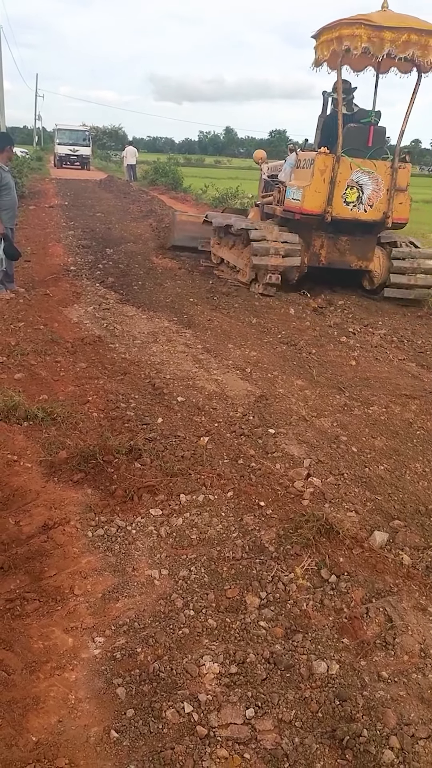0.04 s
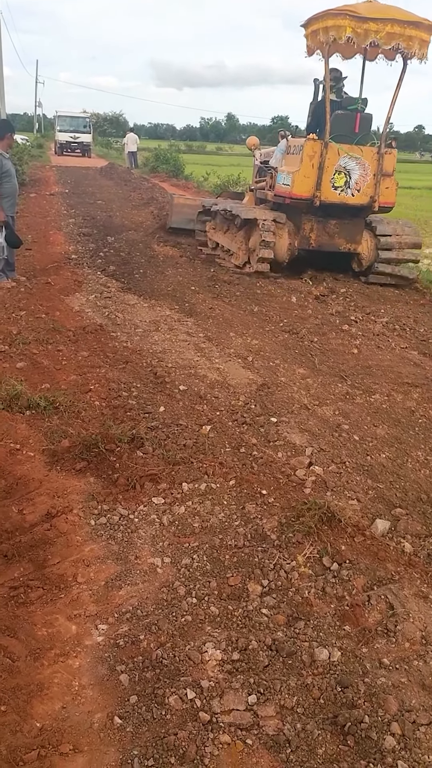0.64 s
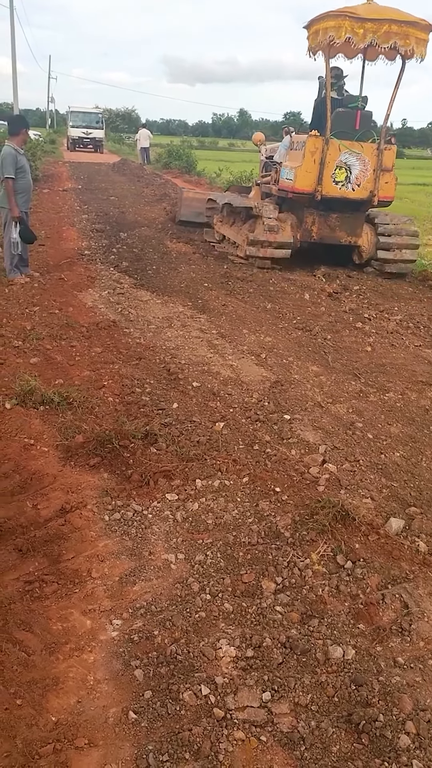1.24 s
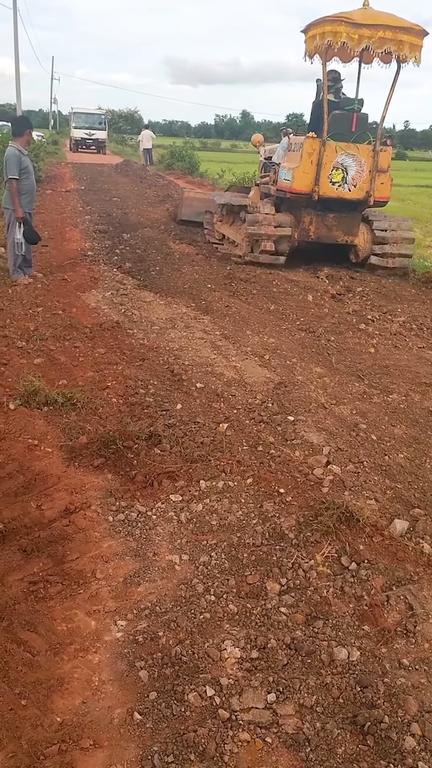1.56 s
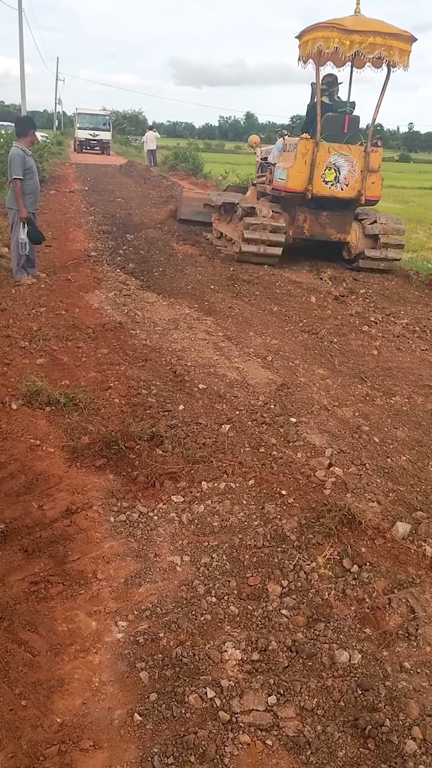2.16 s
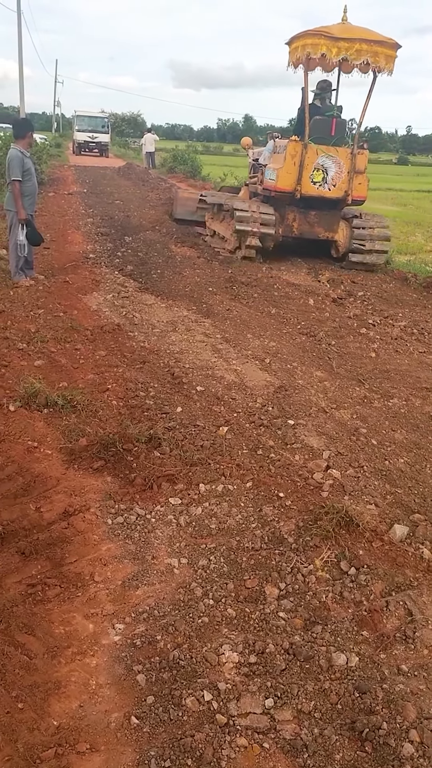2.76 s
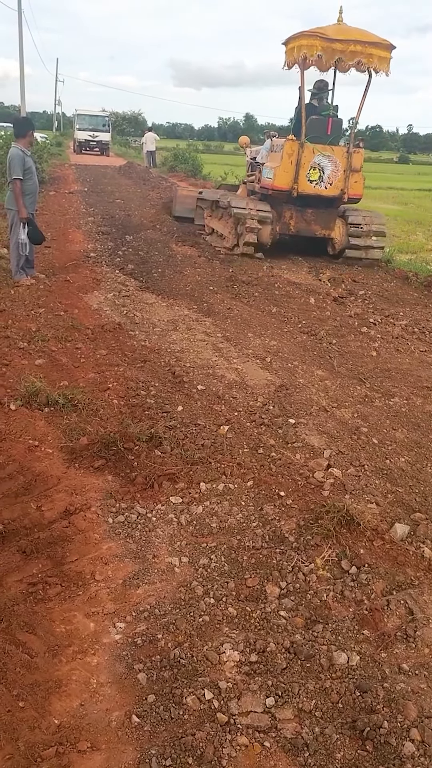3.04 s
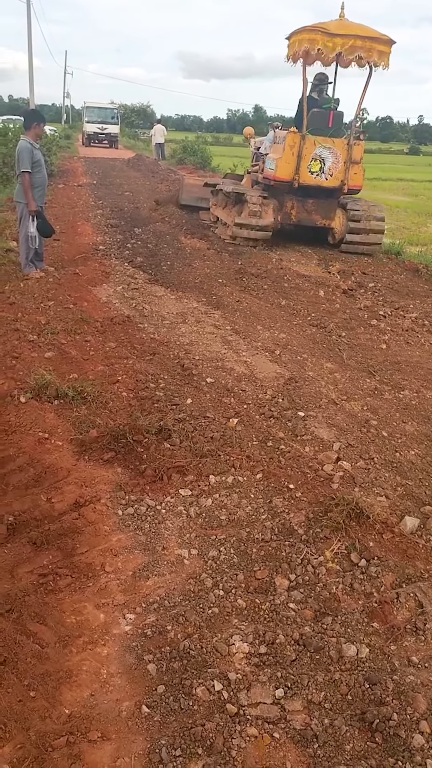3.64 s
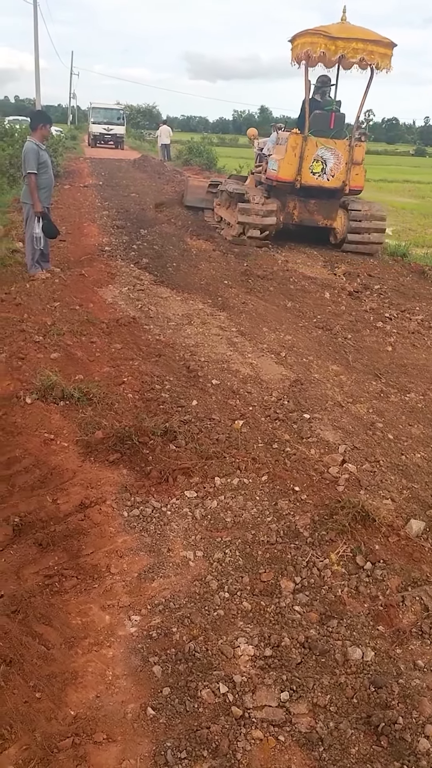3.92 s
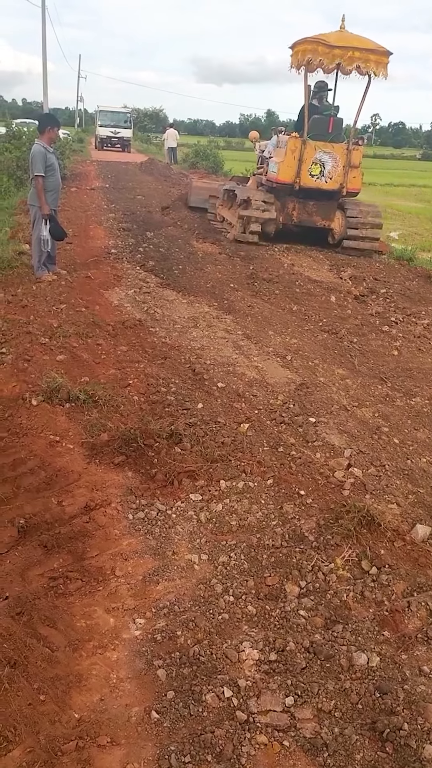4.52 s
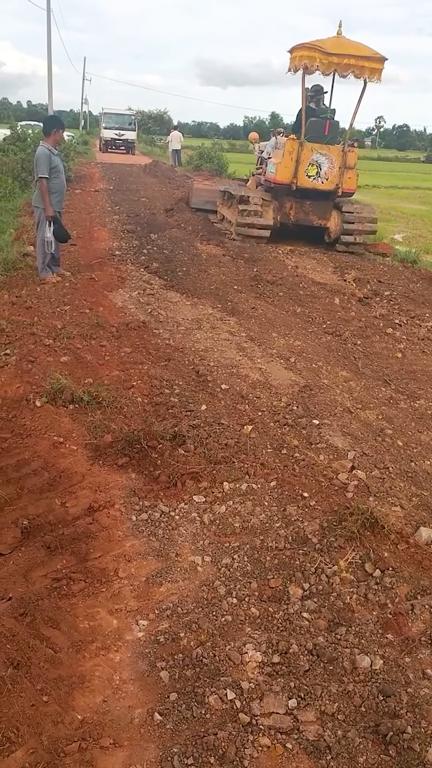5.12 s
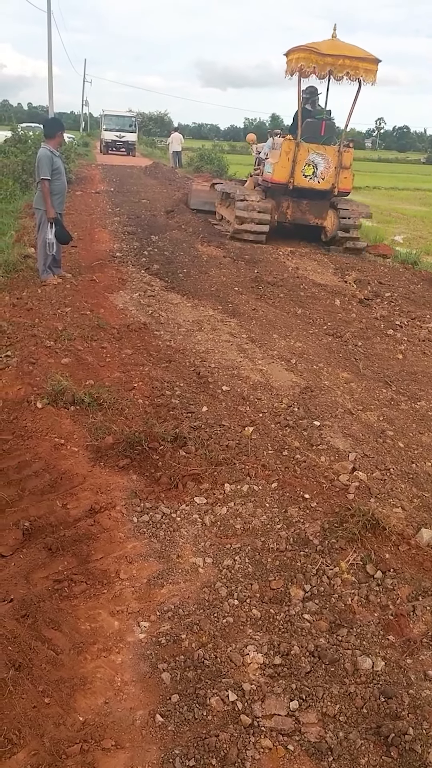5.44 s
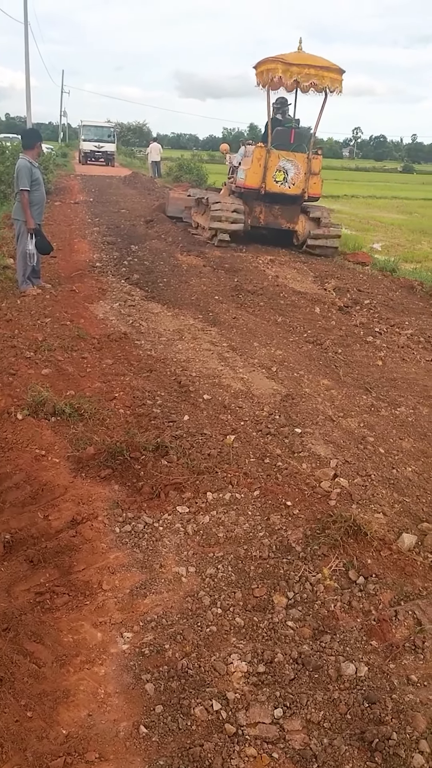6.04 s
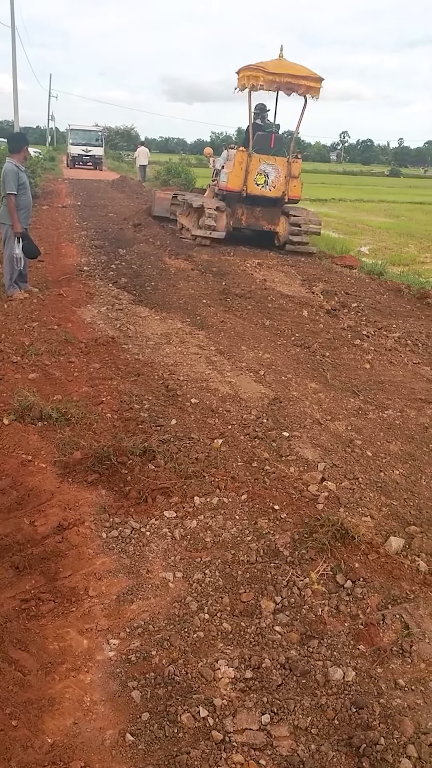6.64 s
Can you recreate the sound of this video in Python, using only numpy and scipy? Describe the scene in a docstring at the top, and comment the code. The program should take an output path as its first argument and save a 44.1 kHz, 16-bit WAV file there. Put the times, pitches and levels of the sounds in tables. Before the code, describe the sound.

Wind buffets the microphone over the diesel drone, clinking tracks and gravel crunch of a slowly receding bulldozer.

```python
"""First you hear a diesel drone and crunching gravel, with gusts thumping a hand-held phone's microphone.
It is a small bulldozer crawling away along a dirt road at steady throttle. The exhaust drones and puffs
twice a cycle, each firing of the four cylinders knocks the engine block, and a drive gear whines.
The steel track links clink onto their toothed wheels, some striking with a snap; dry pins squeak,
and track plates clank onto the rollers and scrape along their guides."""
import sys
import numpy as np
from scipy import signal
from scipy.fft import rfft, irfft
from scipy.io import wavfile
from scipy.ndimage import uniform_filter1d

SR = 44100
rng = np.random.default_rng(int(sys.argv[2]) if len(sys.argv) > 2 else 0)


def bounce(signal):
    """Save signal as a 16-bit WAV file at the path given by the first command-line argument."""
    frames = np.transpose(np.atleast_2d(signal))
    limited = np.clip(frames, -1, 1)
    pcm = np.round(limited * 32767).astype(np.int16)
    wavfile.write(sys.argv[1], SR, pcm)


N = 303408
TIME = np.arange(N) / SR
FREQ = np.maximum(np.arange(N // 2 + 1) * SR / N, 1)
SIDE = np.array([[.5], [-.5]])  # splits a left-right difference between the two channels


def undb(db):
    """Turn decibels into a gain."""
    return 10 ** (np.asarray(db) / 20)


def unit(x):
    """Scale a signal to an average (rms) level of one."""
    return x / np.sqrt(np.mean(x ** 2))


def shape(points):
    """Gain at every frequency, drawn through (f/Hz, level/dB) points."""
    hz, db = np.transpose(points)
    return undb(np.interp(np.log(FREQ), np.log(hz), db))


def resonance(hz, width):
    """How a part that rings at one pitch responds to each frequency."""
    return 1 / (1 + 1j * (FREQ ** 2 - hz ** 2) / (FREQ * width))


def colour(x, response):
    """Filter a signal by a frequency response."""
    return irfft(rfft(x) * response, N)


def walk(rate):
    """Smooth random wandering of size about one, with `rate` steps a second."""
    k = int(SR / rate)
    steps = np.repeat(rng.standard_normal(N // k + 1), k)
    return 1.4 * uniform_filter1d(uniform_filter1d(steps, k), k)[:N]


def noise():
    """Three unrelated noises: one direct, and one scattered to each microphone opening."""
    return rng.standard_normal((3, N))


def burst(age, rise, t60):
    """Loudness of a blow: a quick rise, then a fall of 60 dB in t60 seconds."""
    age = np.clip(age, 0, 1)
    return (1 - np.exp(-age / rise)) * np.exp(-np.log(1000) * age / t60)


def swell(t, half_length):
    """A smooth rise and fall around time t."""
    return np.exp(-np.minimum(((TIME - t) / half_length) ** 2, 30))


def swells_db(table):
    """Add up a table's brief rises and dips in level."""
    return sum(db * swell(t, half) for t, db, half in table)


def receding(db_per_doubling, start_m=8.63, crawl_m_s=0.58):
    """Change of level in dB as the bulldozer gets farther away."""
    return -db_per_doubling * np.log2(1 + crawl_m_s * TIME / start_m)


# how the two microphone openings differ: f/Hz, left lead/rad, likeness (0-1), left minus right/dB
MIC_PORTS = [(200, 0.0, 0.95, -0.0), (380, -0.1, 0.56, 1.5), (540, -1.6, 0.27, -3.6),
             (780, -0.0, 0.97, -0.4), (1150, -1.2, 0.83, 3.5), (1550, -1.0, 0.71, 0.4),
             (2200, -1.9, 0.76, 5.5), (2800, -3.2, 0.95, 0.1), (3500, -3.2, 0.81, 1.9),
             (4100, -4.9, 0.35, 7.1), (4750, -6.3, 0.92, 0.1), (6000, -9.4, 0.64, 1.6),
             (7400, -13.3, 0.35, 1.8), (10000, -15.6, 0.43, 2.2)]
def ports(paths):
    """Direct sound reaches the right opening first; scattered sound reaches each on its own."""
    hz, *columns = np.transpose(MIC_PORTS)
    phase, likeness, pan_db = (np.interp(FREQ, hz, c) for c in columns)
    spectra = rfft(paths)
    direct = np.sqrt(likeness) * spectra[0] * np.exp(1j * SIDE * phase)
    scattered = np.sqrt(1 - likeness) * spectra[1:]
    return irfft((direct + scattered) * undb(SIDE * pan_db), N)


# engine speed, in cycles of four firings: t/s, f/Hz
ENGINE_SPEED = [(0, 20.486), (0.6, 20.416), (0.9, 20.767), (2.1, 20.464), (3.5, 20.27), (4.1, 20.281),
                (4.7, 20.395), (5.3, 20.229), (6.88, 20.416)]
def engine_cycles(first_firing_s=.0318, hunt_cycles=.011):
    """Count engine cycles; the speed governor hunts, so firings come a little early or late."""
    speed = np.interp(TIME, *np.transpose(ENGINE_SPEED))
    return 1 + np.cumsum(speed) / SR - first_firing_s * speed[0] + hunt_cycles * walk(3)


# exhaust tones (4 is the firing tone, the rest are overtones): multiple of the cycle rate, level/dB
EXHAUST_TONES = [(2, -13.5), (3, -18), (4, 0), (5, -23.5), (6, -4.5), (7, -19), (8, -16), (9, -8.5),
                 (10, -16.5), (12, -25.5), (18, -31.5)]
# the firing tone swells or drops out briefly: t/s, change/dB, half length/s
FIRING_SWELLS = [(.25, 1.5, .22), (.495, -5, .02), (.67, 2.5, .056), (.775, -11, .022), (1.35, -1.5, .39),
                 (1.5, 4.5, .028), (2.55, 4, .031), (2.65, 1.7, .5), (3.95, 1.5, .4), (4.48, -17, .027),
                 (4.61, -11, .026), (4.69, 3, .17), (4.765, -24, .019), (4.9, -8, .017), (5.027, -7, .032)]
# tone colour of the gas puffs: f/Hz, level/dB
PUFF_COLOUR = [(25, -32), (70, 8), (130, -7.5), (200, 7.5), (260, -4.5), (380, -6), (480, -33), (800, -68)]
# tone colour of the machine's low rumble: f/Hz, level/dB
RUMBLE_COLOUR = [(20, 2.5), (45, 4), (90, 1), (150, 16), (192, 7.5), (215, -8), (280, 3.5), (450, -23),
                 (800, -107)]
def exhaust(cycle, tone_db=-15, overtone_db=-19, puff_db=-12.5, rumble_db=-28.5, throb_hz=7):
    """Unequal cylinders drone in a stack of tones, with ragged puffs of gas and a low rumble."""
    silencer_hz, silencer_width_hz = 182.3, 7.4
    lope = np.cos(np.pi * cycle)  # strong and weak cycles take turns
    cycle = cycle + .003 * walk(22)
    tone, overtones = 0, 0
    for multiple, db in EXHAUST_TONES:
        # the tones bunch once a cycle, the strongest cylinder's chug; the silencer delays the upper ones
        hz = multiple * ENGINE_SPEED[0][1]
        lag = np.pi / 5 + np.arctan2(silencer_width_hz * hz, silencer_hz ** 2 - hz ** 2)
        wave = undb(db) * np.cos(2 * np.pi * multiple * cycle - lag)
        if multiple == 4:
            throb = np.sin(2 * np.pi * throb_hz * TIME + walk(2.04))
            tone = wave * undb(.95 * throb + .45 * lope + .6 * walk(20))
        else:
            overtones = overtones + wave
    overtones = overtones * undb(lope + .5 * walk(18))
    pulses = np.exp(-(2 * cycle % 1))  # two puffs a cycle
    puffs = unit(colour(pulses * rng.standard_normal(N), shape(PUFF_COLOUR)))
    rumble = unit(colour(rng.standard_normal(N), shape(RUMBLE_COLOUR))) * undb(rumble_db)
    tone = unit(tone) * undb(tone_db + receding(6.5) + swells_db(FIRING_SWELLS))
    chug = (unit(overtones) + undb(puff_db) * puffs) * undb(overtone_db + receding(2))
    return tone + chug + rumble


def loose_steel(low_hz, high_hz, t60, spread_db, count):
    """Hundreds of loose parts chatter: each touch rings briefly at a pitch of its own."""
    when, pitch, turn, left, right = rng.random((count, 5)).T
    size = undb(spread_db * np.minimum(rng.exponential(size=count), 3))
    age = TIME[:int(.7 * t60 * SR)]
    hz = low_hz + (high_hz - low_hz) * pitch
    rings = np.sin(2 * np.pi * (hz[:, None] * age + turn[:, None])) * burst(age, t60 / 10, t60)
    paths = np.zeros((3, N + len(age)))
    shares = size * np.array([np.ones(count), np.sign(left - .5), np.sign(right - .5)])
    for start, share, ring in zip((when * N).astype(int), shares.T, rings):
        paths[:, start:start + len(age)] += share[:, None] * ring
    return unit(paths[:, :N])


def link_blows(rise, t60, link_hz=4.088, near_s=0.067, far_s=0.1696, far_db=-3.5):
    """The steady beat of links landing on the toothed wheels, near track and far track in turn."""
    near, far = (burst((TIME - first) % (1 / link_hz), rise, t60) for first in (near_s, far_s))
    return near + undb(far_db) * far


# tone colour of the knocking and rattling: f/Hz, level/dB
BLOCK_COLOUR = [(200, 10), (450, -0.5), (650, 4.5), (1000, 6.5), (1450, 6.5), (1750, 1.5), (2000, 6.5),
                (2300, 7), (2560, 7), (2720, -26), (3050, -50), (3500, -3), (4400, -14), (8000, -72)]
# ringing body panels: f/Hz, width/Hz, level/dB
BODY_PANELS = [(722, 13, 8.5), (1243, 24, -2), (1474, 22.5, 5.5), (2295, 30, -15)]
# the wheels and tracks rattle harder or ease off: t/s, change/dB, half length/s
RATTLE_SURGES = [(0.965, 3, 0.078), (4.288, -5, 0.029), (5.06, -3.5, 0.086), (6.546, 2, 0.058)]
def block(cycle, rattle_db=-25, knock_db=-11, link_db=1.5):
    """Each firing knocks the engine block, while panels ring and the wheels and tracks rattle."""
    firing, since_firing = (4 * cycle).astype(int), 4 * cycle % 1
    strength = undb(3 * rng.standard_normal(firing[-1] + 1))[firing]
    knock = undb(knock_db) * strength * np.exp(-since_firing / .075)
    rattle = noise() * (.5 * undb(walk(28)) + knock)
    rattle = rattle + undb(-20) * loose_steel(600, 2600, t60=.07, spread_db=2.5, count=1800)
    panels = sum(undb(db) * colour(noise() * undb(2.5 * walk(11)), resonance(hz, width))
                 for hz, width, db in BODY_PANELS)
    surges_db = swells_db(RATTLE_SURGES) + .6 * walk(14)
    level_db = rattle_db + receding(7) + surges_db + link_db * link_blows(rise=0.0041, t60=0.31)
    return unit(ports(colour(rattle, shape(BLOCK_COLOUR)) + panels)) * undb(level_db)


# the gear sings out under load: t/s, level/dB, half length/s, f/Hz
GEAR_SQUEALS = [(.215, -27, .025, 1040), (.676, -22, .032, 1120), (.807, -24.5, .012, 1110),
                (1.095, -25, .02, 1235), (1.28, -27, .02, 1065), (1.418, -27, .026, 1120),
                (1.915, -26, .035, 1105), (2.55, -30, .04, 1100), (3.527, -29.5, .05, 1140),
                (3.95, -31.5, .043, 1150), (4.36, -33, .045, 1135), (4.76, -35, .07, 1130),
                (5.88, -35, .06, 1140)]
def gear(hz=1132, whine_db=-41.5, pan_db=3.5, lead_rad=1.63, flutter_db=2.5):
    """A drive gear sings faintly, and squeals at a shifted pitch whenever the load catches it."""
    pull_hz = sum((pitch - hz) * np.minimum(2 * swell(t, half), 1) for t, _, half, pitch in GEAR_SQUEALS)
    pitch_hz = hz + pull_hz + 8 * walk(9.8) + 20 * walk(80)
    phase = 2 * np.pi * np.cumsum(pitch_hz) / SR
    whine = np.sin([phase + lead_rad, phase]) * undb(SIDE * pan_db)
    steady = undb(whine_db + receding(4) + 3 * walk(12))
    loaded = sum(undb(db) * swell(t, half) for t, db, half, _ in GEAR_SQUEALS)
    return unit(whine) * (steady + loaded) * undb(flutter_db * walk(40))


# tone colour of crushed gravel: f/Hz, level/dB
GRAVEL_COLOUR = [(1500, -17), (3600, 15), (4500, -13), (5300, 5), (7100, 8.5), (8000, 2.5), (8400, 9.5),
                 (9900, 5.5), (10800, -1), (11500, -62), (15000, -72)]
# the tracks bite into loose gravel or cross soft earth: t/s, change/dB, half length/s
GROUND_PATCHES = [(0.532, -3.5, 0.049), (0.646, 6, 0.06), (1.53, 3, .05), (1.297, 3.5, 0.079),
                  (1.5, 1, 0.085), (2.22, -5.5, 0.03), (2.622, 4.5, 0.12), (3.46, -2.5, 0.083),
                  (3.66, 4, 0.1), (4.08, 2, 0.1), (4.392, 5.5, 0.024), (4.8, 2.5, 0.12), (5.04, -4.5, 0.08),
                  (5.95, 1, 0.04), (6.69, -9, 0.038), (6.766, 4, 0.054)]
def gravel(grind_db=-35, grains_per_s=420, grain_s=0.0053, ring_hz=7920, link_db=5):
    """Stones crunch under the plates in tiny grains; the chain jingles and its links ring."""
    hits = rng.random(N) < grains_per_s / SR
    sizes = hits * undb(4 * np.minimum(rng.exponential(size=N), 4))
    grains = unit(signal.lfilter([1], [1, -np.exp(-1 / (grain_s * SR))], sizes))
    crunch = noise() * (1 + undb(-4) * grains) * undb(3.5 * walk(55))
    jingle = undb(-5) * loose_steel(6600, 8150, t60=.14, spread_db=3, count=700)
    links = undb(-6) * unit(colour(crunch * undb(2.5 * walk(20)), resonance(ring_hz, 180) ** 2))
    grit = undb(-10) * loose_steel(4500, 10200, t60=0.18, spread_db=2.5, count=1500)
    grinding = unit(colour(crunch, shape(GRAVEL_COLOUR))) + jingle + grit + links
    ground_db = swells_db(GROUND_PATCHES) + .7 * walk(13)
    level_db = grind_db + receding(12.5) + ground_db + link_db * link_blows(rise=0.0049, t60=0.63)
    # a harder bite is also brighter
    shrill = unit(colour(crunch, resonance(13500, 4500) ** 2)) * undb(ground_db - 24)
    return unit(ports(grinding + shrill)) * undb(level_db)


# tone colour of the wind: f/Hz, level/dB
WIND_COLOUR = [(5, -20), (22, 2), (45, -3), (80, -9), (130, -9), (250, -19), (500, -34), (1200, -50),
               (4000, -80)]
# gusts at the microphone: t/s, level/dB, half length/s, left minus right/dB
WIND_GUSTS = [(0.108, -17, 0.047, 3), (0.24, -18.5, .04, 8), (0.477, -18, 0.044, 6), (1.3, -27, 0.28, 9),
              (2.34, -20, 0.062, 7), (2.594, -18, 0.09, 0), (3.223, -19.5, 0.11, -8),
              (3.582, -22.5, 0.13, 1), (4.453, -20.5, 0.026, -2), (4.98, -27, 0.068, 0),
              (6.412, -22, 0.024, 6), (6.573, -15.5, 0.029, -3), (6.795, -23.5, 0.27, -2)]
# small swirls of air striking one opening: t/s, level/dB, half length/s, left minus right/dB
WIND_SWIRLS = [(0.214, -15, 0.002, 17), (0.374, -20, 0.001, 22), (0.476, -20.5, 0.0026, 15),
               (2.535, -19, 0.0085, -13), (3.175, -17, 0.002, -15), (3.358, -17, 0.0074, -22),
               (6.558, -14, 0.0032, -22), (6.584, -18.5, 0.007, -20), (6.591, -19.5, 0.0025, -28),
               (6.609, -14.5, 0.0017, -19)]
def wind(breeze_db=-36, flutter_db=3):
    """Rough air rumbles on each microphone opening separately; single swirls suck at one of them."""
    rumble = [unit(colour(rng.standard_normal(N), shape(WIND_COLOUR)) * undb(flutter_db * walk(24.97)))
              for _ in range(2)]
    gusts = sum(undb(db + SIDE * pan_db) * swell(t, half) for t, db, half, pan_db in WIND_GUSTS)
    out = np.array(rumble) * (undb(breeze_db) + gusts)
    for t, db, half, pan_db in WIND_SWIRLS:
        # suction builds, then the swirl suddenly lets go
        release = np.tanh(14 * ((TIME - t) / half - .35)) - .4
        out += undb(db + SIDE * pan_db) * swell(t, half) * release
    return out


def clinks(hz=3800, width_hz=650, level_db=-32, uneven_db=1.5):
    """Each link settles on a wheel tooth with a short steely clink."""
    ring = unit(ports(colour(noise(), resonance(hz, width_hz) ** 2)))
    return ring * link_blows(rise=0.013, t60=0.19) * undb(level_db + receding(3) + uneven_db * walk(5.33))


# track links striking the wheels: t/s, snap level/dB, tick level/dB
LINK_STRIKES = [(.0897, -23, -24), (.576, -29.5, -31), (.82, -20, -36), (1.054, -21.5, -34),
                (1.181, -30, -30), (1.259, -34, -28), (2.268, -23.5, -38), (2.6294, -27, -26),
                (3.029, -27, -23), (3.268, -34, -28), (3.325, -22.5, -38), (3.3847, -26, -27),
                (3.4965, -24, -38), (3.995, -26, -38), (4.4867, -28, -27), (4.585, -23.5, -36),
                (5.4545, -21.5, -30), (6.7426, -29, -31)]
def link_strikes():
    """Track links strike the wheels with a short bright snap and a lower tick."""
    snaps = sum(undb(db) * burst(TIME - t, rise=.002, t60=.049) for t, db, _ in LINK_STRIKES)
    ticks = sum(undb(db) * burst(TIME - t, rise=.0006, t60=.04) for t, _, db in LINK_STRIKES)
    bright = shape(GRAVEL_COLOUR) * resonance(12300, 6700)
    lower = resonance(3900, 900) ** 2 + .5 * resonance(5300, 1800) ** 2
    return unit(ports(colour(noise(), bright))) * snaps + unit(ports(colour(noise(), lower))) * ticks


# dry link pins squeaking: t/s, level/dB, f/Hz, length/s, pitch wobble (share of f), glide/Hz
PIN_SQUEAKS = [(0.105, -23.5, 8020, 0.06, 0.005, 0), (.155, -32, 8040, .08, .004, 0),
               (0.328, -26, 7900, 0.055, 0.01, 200), (.58, -31, 7780, .045, .005, 0),
               (0.622, -34, 7000, 0.05, 0.04, 0), (.82, -33, 6900, .05, .025, 0),
               (.91, -33, 7400, .06, .02, -250), (1.172, -32, 7400, 0.022, .015, 0),
               (1.25, -35, 5850, 0.08, .03, -200), (1.39, -31.5, 7050, 0.057, 0.025, -150),
               (1.475, -33, 6920, .06, .015, 100), (1.575, -33, 8000, .065, .007, -220),
               (1.645, -31, 7400, 0.045, 0.035, 0), (2.619, -35, 5390, 0.059, 0.048, 0),
               (3.229, -24, 7920, 0.038, 0.007, 0), (3.56, -40, 4950, 0.19, 0.007, 80),
               (3.975, -33, 8080, .035, .01, -150), (4.02, -37, 7300, .14, .015, 650),
               (4.482, -27.5, 6950, 0.042, .015, -120), (4.52, -31, 7720, 0.05, 0.008, 130),
               (5.923, -38, 6230, 0.062, .11, 0)]
def squeaks(rasp_db=-1.5, hiss_db=-13, ring_db=-5, ring_t60=.24, mode_count=4):
    """A pin sticks and slips: a shaky, gliding high tone with a bright rasp leaves the link ringing."""
    out = np.zeros((2, N))
    slip = np.cumsum([walk(700), walk(700)], axis=1) / SR
    rasp = undb(rasp_db * walk(130))
    hiss = unit(ports(colour(noise(), resonance(7200, 2300) ** 2))) * undb(hiss_db)
    for t, db, hz, length, wobble, glide_hz in PIN_SQUEAKS:
        on = slice(int(t * SR), int((t + length) * SR))
        age = TIME[on] - t
        phase = 2 * np.pi * (hz * (age + wobble * slip[:, on]) + glide_hz * age ** 2 / (2 * length))
        grip = signal.windows.tukey(len(age), .6) * rasp[on] * undb(db)
        out[:, on] += grip * (np.sqrt(2) * np.sin(phase) + hiss[:, on])
        # the link's own pitches (modes) lie around the squeak's and outlast it
        age = TIME[:int(ring_t60 * SR)]
        modes_hz = hz * (1 + .09 * rng.uniform(-1.1, 0.46, (mode_count, 1)))
        phase = 2 * np.pi * (modes_hz * age + rng.random((2, mode_count, 1)))
        ring = np.sin(phase).sum(1) * np.sqrt(2 / mode_count) * undb(db + ring_db)
        out[:, on.start:on.start + len(age)] += ring * burst(age, length / 4, ring_t60)
    return out


# track plates dropping on the rollers: t/s, level/dB, f/Hz
PLATE_CLANKS = [(.312, -16, 792), (.395, -18, 869), (.95, -17, 950), (1.084, -17, 1200), (1.181, -20, 1330),
                (1.92, -16.5, 880), (2.332, -18, 912), (2.837, -21, 703), (2.985, -13, 865),
                (3.152, -20.5, 915), (3.234, -17.5, 1050), (3.48, -18.5, 1100), (3.638, -19.5, 960),
                (3.72, -19.5, 1200), (3.888, -17, 1020), (4.213, -20, 900), (4.38, -18, 1150),
                (4.509, -19, 1000), (5.045, -17.5, 760), (5.202, -17.5, 1045), (5.369, -14.5, 780),
                (5.443, -19.5, 980), (6.03, -20.5, 830), (6.433, -16.5, 885), (6.468, -19.5, 960),
                (6.52, -21, 738)]
def clanks(left_db=-1.5, lead_rad=0.42, mode_count=8, rise=.0011, t60=.06, rebound_db=-10):
    """A plate hits a roller, rings at several close pitches and rocks back with a weaker second touch."""
    out, age = np.zeros((2, N)), TIME[:SR // 4]
    for t, db, hz in PLATE_CLANKS:
        offsets = np.linspace(-1, 1, mode_count) + rng.standard_normal(mode_count) / mode_count
        modes_hz = hz * (1 + .19 * offsets)
        phase = 2 * np.pi * (modes_hz[:, None] * age + rng.random((mode_count, 1)) / 2)
        ring = np.sum([undb(left_db) * np.sin(phase + lead_rad), np.sin(phase)], 1) / np.sqrt(mode_count)
        rebound_s = .035 * (.5 + rng.random())
        touches = burst(age, rise, t60) + undb(rebound_db) * burst(age - rebound_s, 2 * rise, t60)
        start = int(t * SR)
        out[:, start:start + len(age)] += (ring * touches * undb(db))[:, :N - start]
    return out


# plate edges scraping along their guides: t/s, level/dB, f/Hz, half length/s
PLATE_SCRAPES = [(.475, -27, 2100, .055), (.67, -31, 2250, .04), (1.27, -31, 2020, .06),
                 (2.07, -32, 2150, .09), (4.405, -23.5, 2200, .034), (6.47, -31, 2250, .025),
                 (6.81, -30, 2250, .028)]
def scrapes(width_hz=190, judder_db=3, pan_db=4.5, lead_rad=-1.9):
    """A plate edge judders along its guide, and the steel rings roughly around one pitch."""
    rub = colour(rng.standard_normal((2, N)), 1 / (1 + (FREQ / width_hz) ** 4))
    rub = unit(rub) * undb(judder_db * walk(120))
    out = np.zeros((2, N))
    for t, db, hz, half in PLATE_SCRAPES:
        on = np.abs(TIME - t) < 3 * half
        phase = 2 * np.pi * hz * TIME[on] + np.array([[lead_rad], [0]])
        ring = rub[0, on] * np.cos(phase) + rub[1, on] * np.sin(phase)
        out[:, on] += ring * swell(t, half)[on] * undb(db + SIDE * pan_db)
    return out


def scene():
    """Engine, tracks and wind together."""
    cycle = engine_cycles()
    engine = exhaust(cycle) + block(cycle) + gear()
    tracks = clanks() + scrapes() + squeaks() + gravel() + link_strikes() + clinks()
    return engine + tracks + wind()


def record(dry):
    """The phone clips any peak that is too loud and cuts the highest treble."""
    treble_cut = signal.ellip(8, .2, 80, 15750, fs=SR, output="sos")
    return signal.sosfilt(treble_cut, np.clip(dry, -1, 1))


dry = scene()
out = record(dry)
bounce(out)
```